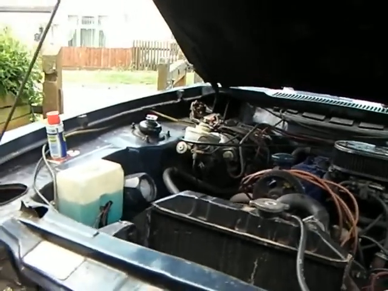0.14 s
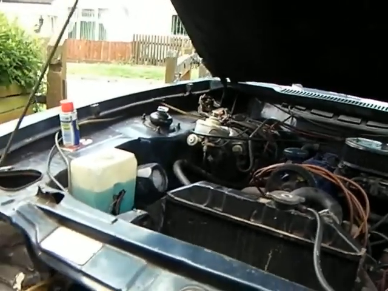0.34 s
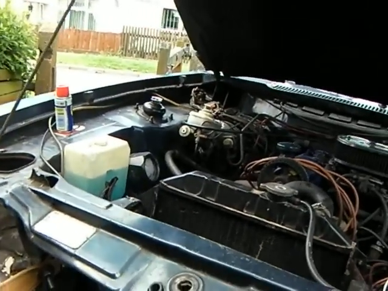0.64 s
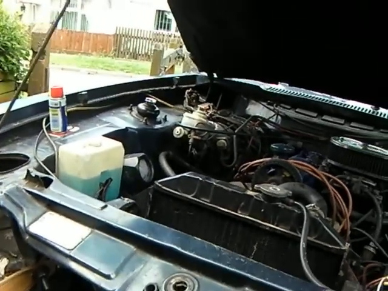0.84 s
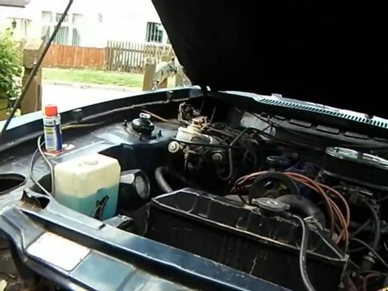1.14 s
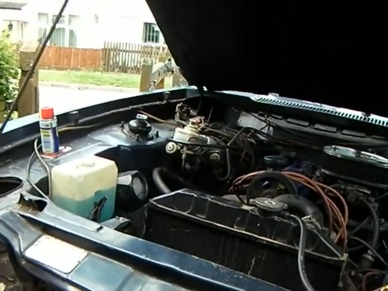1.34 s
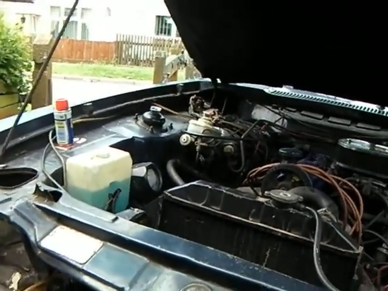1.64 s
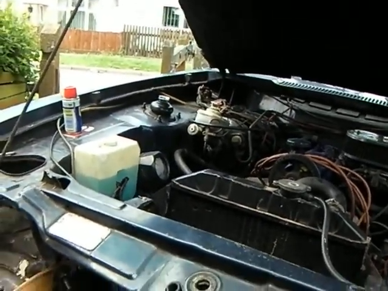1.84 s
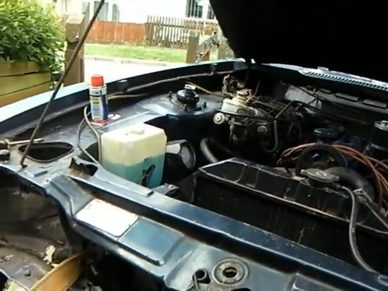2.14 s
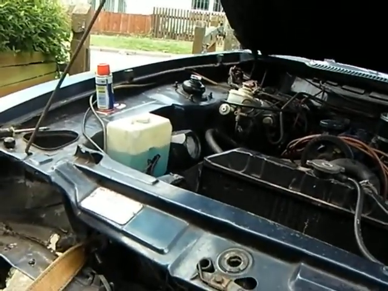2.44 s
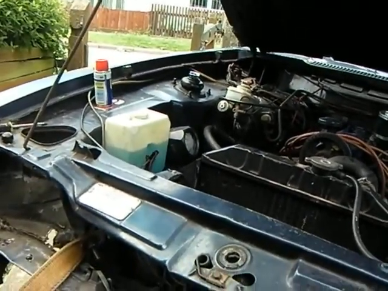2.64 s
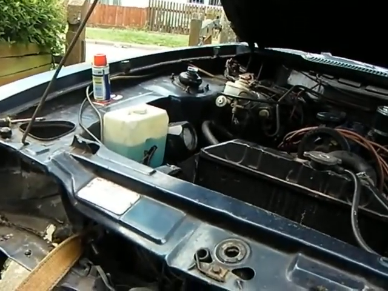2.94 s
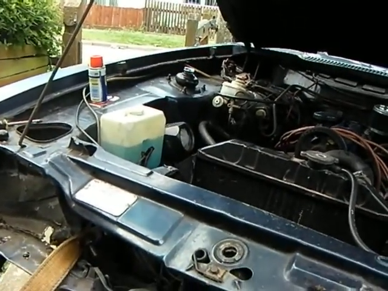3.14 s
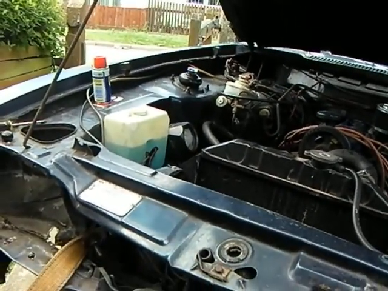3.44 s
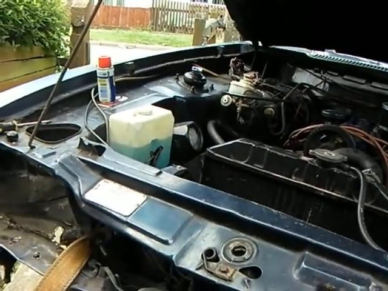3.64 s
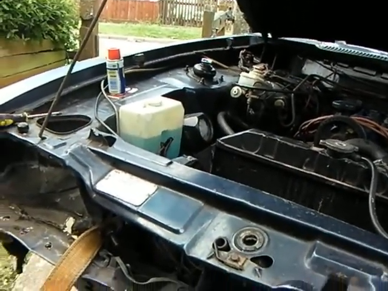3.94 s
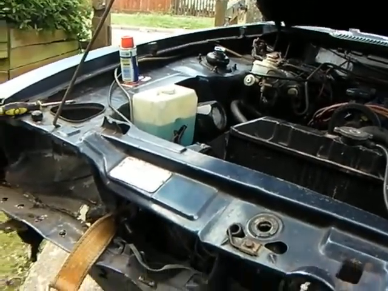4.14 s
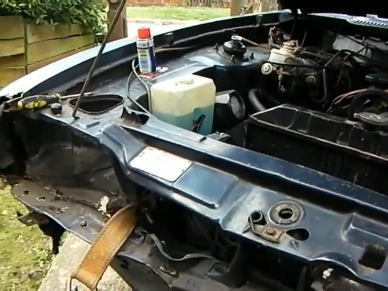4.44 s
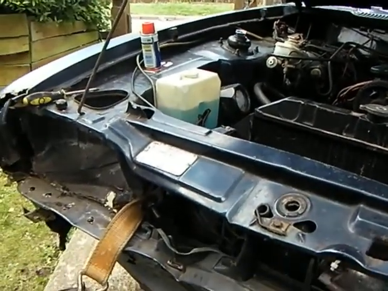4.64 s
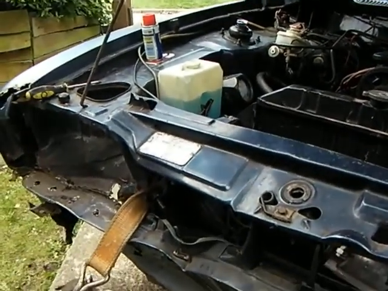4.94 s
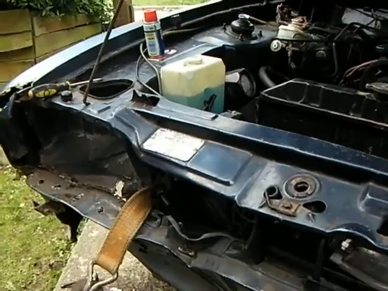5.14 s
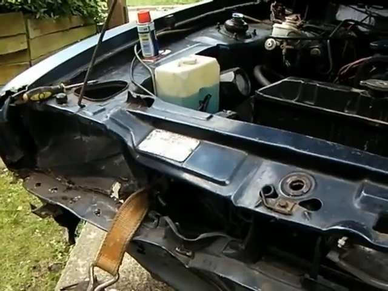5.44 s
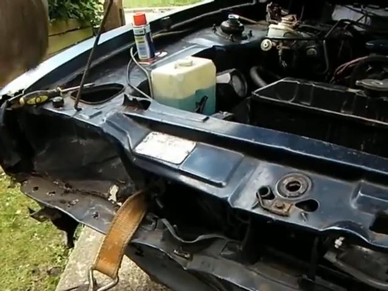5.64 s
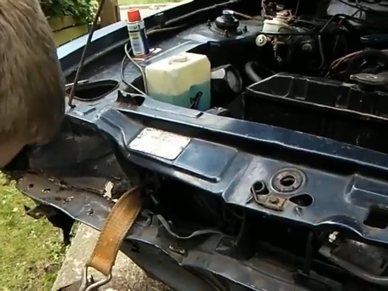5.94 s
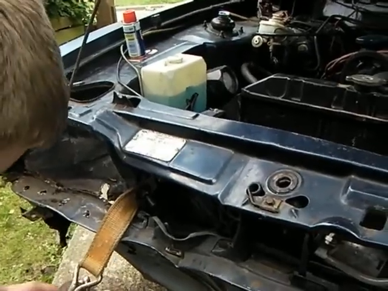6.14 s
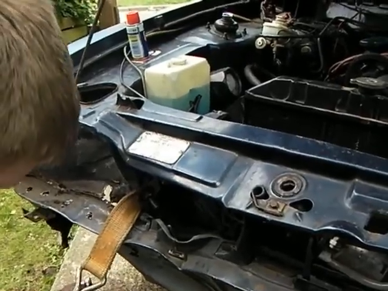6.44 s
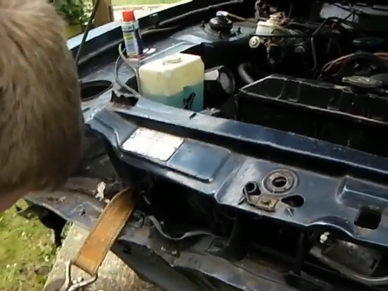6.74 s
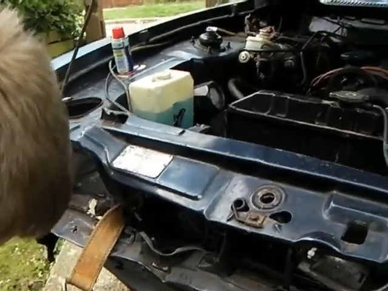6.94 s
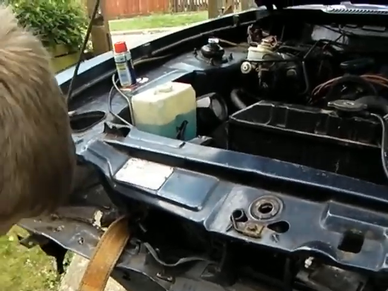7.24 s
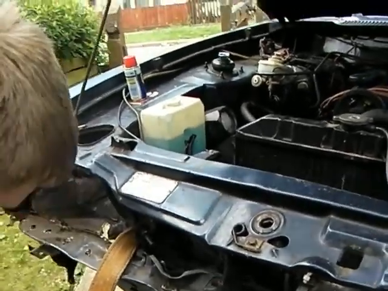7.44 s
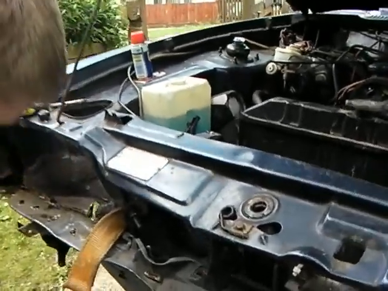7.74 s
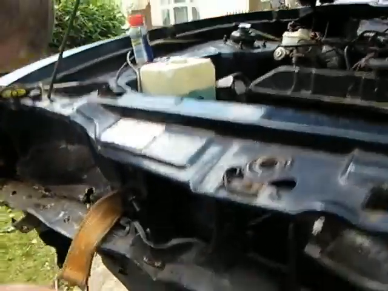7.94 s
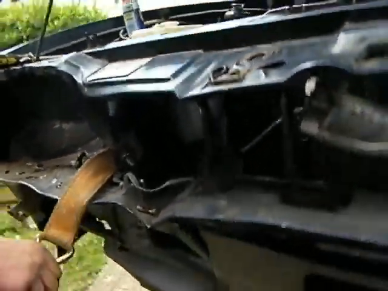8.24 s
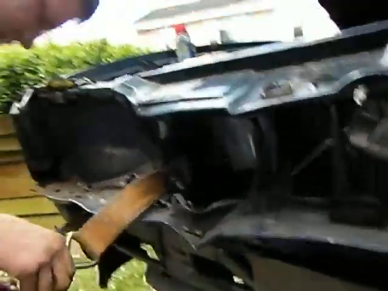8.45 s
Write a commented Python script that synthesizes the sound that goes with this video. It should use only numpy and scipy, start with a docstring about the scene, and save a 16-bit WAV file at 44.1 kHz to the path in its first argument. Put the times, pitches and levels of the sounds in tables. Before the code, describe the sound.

A ratchet strap is cranked tight on old car metal, with sharp steel cracks, creaks and low groans in bursts, amid crisp clicking rustle outdoors.

```python
"""Outdoors, at the front of an old car, close to a hand-held camera: a ratchet strap is hooked on and cranked tight.
Strap and steel fittings stick and slip: noise bursts and ringing steel modes for cracks, dense slips for creep.
The slips drive sheet-metal resonances; friction noise through a moving low resonance makes the groan.
Crisp clicks rustle by the microphone; a bright steel ping comes back from across the street.
Filtered noise gives handling rumble, bumps and steady outdoor air; short sines give faint far chirps."""
import sys
import numpy as np
from scipy import signal
from scipy.io import wavfile
from scipy.ndimage import uniform_filter1d, minimum_filter1d

SR = 44100
rng = np.random.default_rng(int(sys.argv[2]) if len(sys.argv) > 2 else 0)


def transcribe(u):
    """Save the signal u as a 16-bit wav file named by the first command-line argument.

    u: samples, shape (n,) or (channels, n), limited to [-1, 1]; the rate is SR.
    q: integer samples, one column per channel.
    """
    v = np.clip(np.atleast_2d(u).T, -1, 1)
    q = np.round(v * 32767).astype(np.int16)
    wavfile.write(sys.argv[1], SR, q)


N = 378637
TIME = np.arange(N) / SR
TAPS = 4096
BINS = np.fft.rfftfreq(TAPS, 1 / SR)  # Hz
EDGE_HZ = 16150  # upper band limit

# loud slips of the loaded strap, before gain: (time [s], level [dB], brightness [dB])
CRACKS = [(0.2917, -17, -2), (0.3414, -34.5, -17), (0.3937, -19.5, 2), (0.5467, -21.5, 5),
          (0.5657, -17.5, 2), (0.5774, -15.5, -5.5), (0.589, -21.5, 11), (0.655, -26, -10),
          (0.6709, -15, 0), (0.928, -21.5, -6), (1.0043, -16, 5.5), (1.0452, -15, -3), (1.0627, -14, -1.5),
          (1.0853, -27, 0), (1.1425, -12.5, 3.5), (1.1693, -22.5, 7.5), (1.2044, -20, -0.5),
          (1.9837, -25, -10.5), (1.996, -18, 11), (2.091, -27.5, 14.5), (2.12, -16.5, 7),
          (2.1388, -17.5, -8.5), (2.203, -20, -4), (2.228, -16, -2.5), (2.2425, -11, 6), (2.267, -23, 20.5),
          (2.282, -6.5, 1), (2.297, -15.5, 8), (2.3386, -13, 0), (2.4106, -20.5, -3), (2.454, -21.5, -3),
          (2.8479, -22.5, 2.5), (2.8927, -24, 3), (2.9785, -23.5, 8), (3.0568, -19, 8.5), (3.0984, -8.5, 5),
          (3.1451, -18.5, 5), (3.1755, -18, 5.5), (3.2041, -14.5, 1), (3.313, -30, 3), (3.3704, -17, 4.5),
          (3.394, -18, 5.5), (3.4288, -10.5, 4.5), (3.518, -18, 11), (3.536, -17, 10), (3.559, -20, 4),
          (3.5922, -15, 2.5), (3.651, -23, 7), (3.697, -22.5, -2.5), (3.835, -22.5, 1.5), (3.8735, -19, -1),
          (3.936, -22.5, 7), (3.985, -19, 1.5), (4.0343, -18.5, 5), (4.0649, -16, 1), (4.1328, -25, 6),
          (4.217, -28, 7), (4.3746, -25, 3.5), (4.4305, -23, 7), (4.4499, -19, 2.5), (4.478, -21, 0),
          (4.5048, -21, 8), (4.553, -26, 8), (4.6113, -25.5, 11.5), (4.6872, -21, 9.5), (4.7871, -19, -0.5),
          (4.804, -19, 0.5), (4.8843, -26.5, -1), (4.9445, -22.5, -2), (5.014, -23, 0), (5.055, -33, -8),
          (5.112, -21.5, 1), (5.15, -27, 2.5), (5.1622, -24.5, 11.5), (5.1982, -21, 2), (5.2368, -15.5, 3),
          (5.2705, -14, 7), (5.337, -17.5, 6), (5.3769, -17.5, 4), (5.83, -25, 0), (5.9576, -35.5, -5),
          (6.0061, -27, -0.5), (6.036, -35, -10), (6.049, -34, 2), (6.151, -33, -7.5), (6.678, -23, -2.5),
          (6.691, -26.5, -3), (6.707, -22.5, -2.5), (6.729, -19, -1.5), (6.7789, -15, 1.5), (6.811, -20, 5),
          (6.836, -17, 2.5), (6.858, -16.5, 5), (6.8798, -18.5, 7.5), (6.904, -22, 8), (6.919, -19, 3.5),
          (6.9734, -22.5, 2), (6.9941, -14.5, 2.5), (7.0162, -22.5, 6), (7.034, -20.5, 6.5),
          (7.099, -19.5, 2.5), (7.1514, -20.5, -1.5), (7.195, -25.5, 4.5), (7.211, -27.5, 6),
          (7.2717, -19.5, -2), (7.3189, -26.5, -4), (7.362, -36.5, -14.5), (7.701, -50.5, 4),
          (8.03, -48, -3), (8.2998, -26, -5)]
# resonances of ratchet and hook, before sharpness: (frequency [Hz], width [Hz], height [dB])
STEEL = [(2375, 990, 11.5), (3370, 360, 14.5), (3680, 505, 4.5), (4280, 880, 10.5), (4646, 210, 10),
         (5473, 720, 11.5), (6850, 690, 11.5), (7870, 190, 10), (8460, 190, 13.5), (11200, 600, 8.5),
         (11900, 223, -0.5), (14800, 740, 18)]
# how firmly the taut strap couples slips to the metal, before gain: (time [s], coupling [dB])
COUPLING = [(.3, 15), (1.25, 14.5), (2, 9), (3.1, 8.5), (4.5, 0.5), (5.3, 9.5), (5.8, -17), (6.8, -10),
            (7.2, 14.5), (8.3, -28)]
# pulls on the strap, levels before gain: (start [s], length [s], creep [dB], groan [dB],
# groan pitch [Hz], crackle [dB], camera shake [dB])
PULLS = [(0.27, 0.29, -27.5, -36, 374, -59, -43), (0.531, 0.17, -21.5, -42, 385, -36, -39.5),
         (0.768, 0.12, -33.5, -37.5, 390, -38, -47), (0.917, 0.24, -20.5, -38.5, 400, -26, -40.5),
         (1.959, 0.4, -19, -45.5, 407, -32, -46.5), (2.859, 0.26, -21, -45, 426, -32.5, -45),
         (3.271, 0.24, -21, -40.5, 481, -32.5, -50.5), (3.41, 0.36, -23.5, -56, 487, -31, -54.5),
         (3.804, 0.29, -22.5, -44, 466, -43, -56), (4.12, 0.17, -31, -54, 476, -54, -71),
         (4.312, 0.49, -25.5, -39, 466, -31, -73), (5.138, 0.27, -28, -44.5, 475, -43, -59),
         (6.786, 0.38, -24.5, -58, 460, -30, -68), (7.172, 0.21, -33.5, -66, 440, -33.5, -72)]


def amp(db):
    """Decibels to gain."""
    return 10 ** (np.asarray(db) / 20)


def unit(x):
    """Scales to rms 1."""
    return x / np.sqrt(np.mean(x ** 2) + 1e-20)


def read(points, hz):
    """Interpolates a spectrum on a log-frequency axis."""
    f, value = np.transpose(points)
    return np.interp(np.log(hz + 1), np.log(f + 1), value)


def curve(rows, order=1):
    """One column of a time table, at every sample."""
    columns = np.transpose(rows)
    return np.interp(TIME, columns[0], columns[order])


def add(mix, start_s, sound):
    """Mixes a sound in at start_s."""
    part = mix[..., max(round(start_s * SR), 0):][..., :sound.shape[-1]]
    part += sound[..., :part.shape[-1]]


def colour(x, db):
    """Causal minimum-phase filter with the gains db at BINS."""
    log_gain = np.log(amp(np.r_[db, db[-2:0:-1]]))
    response = np.fft.ifft(np.exp(signal.hilbert(log_gain).conj())).real
    return signal.oaconvolve(x, response[:TAPS // 2])[:len(x)]


def resonate(x, hz, width_hz):
    """Resonance of gain 1 whose frequency may move: shift to 0 Hz, one-pole lowpass, shift back."""
    turn = np.exp(2j * np.pi * np.cumsum(hz * np.ones(len(x))) / SR)
    r = np.exp(-np.pi * width_hz / SR)
    return 2 * (turn * signal.lfilter([1 - r], [1, -r], x / turn + 1e-18)).real


def steady(x, seconds):
    """Evens out the slow level and keeps the fine grain."""
    power = abs(uniform_filter1d(x ** 2, int(seconds * SR) + 1))
    return x / np.sqrt(power + 1e-12)


def ports(make, wide_db=0):
    """Left and right microphone ports: a common sound plus and minus an unrelated difference."""
    # difference against sum, before wide_db: (frequency [Hz], level [dB])
    width = [(60, -12.5), (140, -15.5), (300, -18), (1200, -20), (2500, -25.5), (4400, -8), (8000, -9.5),
             (15000, -4.5)]
    mid = make()
    side = colour(make(), read(width, BINS) + wide_db)
    return np.array([mid + side, mid - side])


def dying(energy, decay_s):
    """Each kick of energy dies away; decay_s is the amplitude time constant."""
    return signal.lfilter([1], [1, -np.exp(-2 / (decay_s * SR))], energy)


def kicks(per_s, spread_db):
    """Energy of randomly timed slips: many small, a few large."""
    happens = rng.random(N) < per_s / SR
    return happens * amp(spread_db * np.minimum(rng.exponential(1, N), 4)) ** 2


def strokes(rows, order, rise_s, fall_s, arch_db):
    """Gain for rows (start, length, levels..): each rises, arches over its middle and dies away."""
    power = np.zeros(N)
    for row in rows:
        start_s, length_s = row[:2]
        t = np.arange(int((length_s + 8 * fall_s) * SR)) / SR
        arch = amp(row[order] - arch_db * np.minimum((2 * t / length_s - 1) ** 2, 1))
        rise = np.minimum(t / rise_s, 1)
        fall = np.exp(-np.maximum(t - length_s, 0) / fall_s)
        add(power, start_s, (arch * rise * fall) ** 2)
    return np.sqrt(power)


def rustling():
    """Gain of the spells of rustling."""
    # crisp rustling between the pulls: (start [s], length [s], level [dB])
    spells = [(0.0, 0.29, -29.5), (1.215, 0.11, -36), (1.345, 0.19, -33), (1.54, 0.96, -34.5),
              (1.615, 0.049, -27), (2.38, 0.42, -37), (3.14, 0.32, -36.5), (3.73, 0.11, -40),
              (4.24, 0.081, -40), (4.8, 0.27, -38), (5.025, 0.083, -28), (5.46, 0.45, -38.5),
              (5.615, 0.15, -36.5), (5.85, 0.22, -51), (6.2, 0.17, -48), (6.72, 0.098, -28),
              (7.49, 0.083, -48), (8.33, 0.25, -57.5)]
    return strokes(spells, order=2, rise_s=0.012, fall_s=0.025, arch_db=2.0)


def steel_db(sharpness, vary_db):
    """Colour of one contact: where it slips decides each resonance's frequency and strength."""
    # slip under the resonances: (frequency [Hz], level [dB])
    slip_tone = [(100, -19), (300, -15.5), (600, -12), (1000, -5), (1600, -0.5), (2900, 0.5), (4000, 3),
                 (6200, 1.5), (9500, 3), (13000, -2.5), (15500, -16.5)]
    detune = 0.007  # relative
    chance = rng.standard_normal((len(STEEL), 2))
    peaks = 0
    for (hz, width_hz, db), (a, b) in zip(STEEL, chance):
        offset = 2 * (BINS - hz * (1 + detune * b)) / width_hz
        peaks = peaks + (db + vary_db * a) / (1 + offset ** 2)
    tone = read(slip_tone, BINS) + sharpness * peaks
    return tone - 10 * np.log10(np.mean(amp(tone) ** 2))


def cracks(burst_s=0.0061, ring_s=0.021, ring_db=-10, gain_db=4.0, release_db=2,
           detune=0.007, treble_damping=0.19, size=3000):
    """Sharp release and millisecond burst, then ringing steel modes unless slack webbing damps them."""
    out, t = np.zeros((2, N)), np.arange(size) / SR
    burst_shape, slack_slope = 1.8, 0.9  # exponent; dB of ring per dB of lost coupling
    burst = np.exp(-(t / burst_s) ** burst_shape)
    release = amp(release_db) * (t == 0)
    treble = read([(1500, -1.13), (4200, 0.34), (8000, 0.95), (15000, 1.4)], BINS)
    for s, db, bright_db in CRACKS:
        tone = steel_db(sharpness=1.126, vary_db=1.0) + bright_db * treble
        # bent plates have their modes in close pairs
        modes_hz = np.repeat(np.transpose(STEEL)[0], 2) * (1 + detune * rng.standard_normal(2 * len(STEEL)))
        heights = amp(np.interp(modes_hz, BINS, tone))
        damping = (modes_hz / STEEL[1][0]) ** treble_damping / ring_s  # 1/s
        waves = np.exp(np.outer(2j * np.pi * modes_hz - damping, t)) * (1 - np.exp(-t / 0.001))
        slack_db = min(np.interp(s, *np.transpose(COUPLING)), 0)
        freed = amp(ring_db + slack_slope * slack_db)

        def slip():
            noise = colour(burst * (release + rng.standard_normal(size)), tone)
            snap = unit(noise) * np.sqrt(np.mean(burst ** 2))
            phases = np.exp(2j * np.pi * rng.random(len(heights)))
            ring = ((heights * phases) @ waves).real
            return snap + freed * ring / np.sqrt(np.sum(heights ** 2) / 2)

        loudness = amp(db + gain_db) * np.sqrt(np.mean(amp(tone) ** 2))
        add(out, s, loudness * ports(slip, wide_db=-0.5))
    return out


def creep(gain_db=-0.5, stick_db=-9, stick_s=0.0024, jostle_db=-11, even_s=0.053, tail_db=-8, contacts=3):
    """Dense small slips at several contacts in each pull; the strap sticks briefly before each crack."""
    slips = [kicks(per_s=75, spread_db=6.0) for _ in range(contacts)]
    energy = np.array([dying(k, decay_s=0.007) + amp(tail_db) ** 2 * dying(k, decay_s=0.026) + 0.003
                       for k in slips])
    share = energy / abs(uniform_filter1d(energy.sum(0), int(even_s * SR)))
    stuck = np.zeros(N)
    for s, _, _ in CRACKS:
        add(stuck, s - 1.5 * stick_s, np.hanning(int(2 * stick_s * SR)))
    out = 0
    for part in share:
        tone = steel_db(sharpness=0.72, vary_db=-1.0)
        out = out + ports(lambda: colour(np.sqrt(part) * rng.standard_normal(N), tone), wide_db=1.0)
    effort = strokes(PULLS, order=2, rise_s=0.03, fall_s=0.027, arch_db=4.5)
    activity = np.hypot(effort, amp(jostle_db) * rustling())
    return out * activity * amp(gain_db + stick_db * stuck)


def panel(slips, gain_db=4):
    """The strap carries the slips into the sheet metal, which rings on."""
    # pulled sheet metal: (frequency [Hz], width [Hz], level [dB])
    modes = [(982, 39, -8.5), (1410, 15, 0), (1573, 330, -11), (2174, 51, -4), (3330, 60, -13),
             (4400, 94, -3), (4670, 80, -14)]
    drive = slips.mean(0) * amp(curve(COUPLING) + gain_db)
    # broad sheet radiates the low modes best
    lift_db = read([(1500, -3.0), (2300, -6.0), (3300, -16.5)], BINS)
    drive = colour(drive, lift_db)
    return sum(amp(db) * resonate(drive, hz, width_hz) for hz, width_hz, db in modes)


def groan(gain_db=-2.0, width_hz=55, waver_db=0.5):
    """Friction noise excites one low body resonance in each pull; level wavers, pitch follows PULLS."""
    hz = curve([(row[0] + row[1] / 2, row[4]) for row in PULLS])

    def voice():
        narrow = resonate(rng.standard_normal(N), hz, width_hz)
        return steady(resonate(narrow, hz, 2 * width_hz), seconds=0.15)

    slow = uniform_filter1d(rng.standard_normal(N), int(0.045 * SR))
    waver = unit(uniform_filter1d(slow, int(0.02 * SR)))
    effort = strokes(PULLS, order=3, rise_s=0.03, fall_s=0.07, arch_db=5.0)
    return ports(voice, wide_db=-3.5) * effort * amp(gain_db + waver_db * waver)


def rustle(gain_db=-2.0, snap_db=5.0, tail_db=-17):
    """Very short dry clicks, each trailed by a little fizz, during the pulls and between them."""
    # rustle colour: (frequency [Hz], level [dB])
    rustle_tone = [(290, -20.5), (500, -10), (817, -29.5), (1160, -8.5), (1780, -19), (1940, -8.5),
                   (3040, -10.5), (5050, -2.5), (10900, 3.5), (15800, -4)]
    # sharpest snaps, before snap_db: (time [s], level [dB])
    sharp_snaps = [(0.112, -22), (0.1634, -22), (0.176, -13), (0.202, -14.5), (0.214, -19), (0.2562, -15),
                   (0.475, -14), (0.5176, -21.5), (0.708, -17.5), (1.4005, -16), (1.4323, -8),
                   (1.6252, -20), (1.6829, -18), (1.7753, -16), (2.5146, -21), (2.8155, -16), (5.039, -17),
                   (5.6339, -21), (6.21, -31.5), (7.2678, -15.5), (7.3772, -35), (7.514, -30)]

    def grain(energy):
        return dying(energy, decay_s=0.00043) + amp(tail_db) ** 2 * dying(energy, decay_s=0.018)

    snaps = np.zeros(N)
    for s, db in sharp_snaps:
        add(snaps, s, amp([db + snap_db]) ** 2)
    small = steady(np.sqrt(grain(kicks(per_s=430, spread_db=8.0)) + 0.061), seconds=0.087)
    crackle = strokes(PULLS, order=5, rise_s=0.02, fall_s=0.015, arch_db=3.0)
    activity = np.hypot(rustling(), crackle)
    shape = np.sqrt((small * activity * amp(gain_db)) ** 2 + grain(snaps))
    tone = read(rustle_tone, BINS) - np.maximum(BINS - EDGE_HZ, 0) / 100
    tone = tone - 10 * np.log10(np.mean(amp(tone) ** 2))
    return ports(lambda: colour(shape * rng.standard_normal(N), tone), wide_db=4.0)


def ping(ring_db=-28, free_s=2.672):
    """Steel snaps against steel, then swings free and rings in high decaying modes."""
    # modes of a small steel part, before ring_db: (frequency [Hz], level [dB], t60 [s])
    modes = [(3690, -16.5, .15), (5230, 1, 0.18), (5550, -10, .22), (7903, 4, .17), (8040, -13.5, 0.17),
             (9870, -5.5, .17), (10700, 6, .13), (10750, 1, 0.121), (12350, -2, 0.45), (12250, -4, .5),
             (15330, 6, .13)]
    # hard contacts, the last an echo from the houses: (time [s], level [dB], decay [s])
    hits = [(2.656, -3, 0.0039), (2.656, -7.5, 0.019), (2.747, -26, 0.0097)]
    # contact colour: (frequency [Hz], level [dB])
    contact_tone = [(1000, -63), (4000, -29.5), (9000, -18), (11600, -13.5), (12350, 9), (13200, -20.5),
                    (16000, -26)]
    out, t = np.zeros((2, N)), np.arange(SR // 3) / SR

    def contact():
        return steady(colour(rng.standard_normal(len(t)), read(contact_tone, BINS)), seconds=0.0034)

    def ring():
        return sum(amp(db - 60 * t / t60_s) * np.sin(2 * np.pi * (hz * t + rng.random()))
                   for hz, db, t60_s in modes)

    for s, db, decay_s in hits:
        envelope = np.exp(-t / decay_s) * (1 - np.exp(-t / 0.000086))
        add(out, s, amp(db) * ports(contact, wide_db=-1.5) * envelope)
    add(out, free_s, amp(ring_db) * ports(ring, wide_db=-1.0) * (1 - np.exp(-t / 0.001)))
    return out


def handling(gain_db=0.5):
    """Low noise rumble swelling with each pull; narrow noise bursts for soft bumps, scuffs and squeaks."""
    # rumble colour: (frequency [Hz], level [dB])
    rumble_tone = [(20, -15), (50, -3.5), (95, 2), (135, 0.5), (200, -7.5), (300, -9.5), (600, -6.5),
                   (1200, -10), (3000, -97.5)]
    # rumble from holding the camera, before gain: (time [s], level [dB])
    hold = [(0, -48.5), (1.5, -53), (2.3, -49.5), (2.68, -62), (2.84, -53), (3.9, -55.5), (4.25, -69.5),
            (5.9, -72.5), (7.95, -65), (8.2, -58), (8.59, -54.5)]
    # bumps, scuffs, squeaks: (time [s], level [dB], length [s], frequency [Hz], width per stage [Hz])
    bumps = [(0.015, -32.5, 0.096, 1760, 2050), (0.317, -34.5, 0.045, 1410, 60),
             (0.404, -28.5, 0.044, 1410, 90), (0.678, -35.5, 0.05, 403, 70), (0.95, -43, 0.055, 136, 90),
             (0.96, -45, 0.11, 1410, 50), (1.169, -41.5, 0.042, 109, 90), (1.196, -38.5, 0.058, 1410, 50),
             (1.911, -46, 0.058, 390, 60), (2.808, -41.5, 0.025, 249, 400),
             (2.837, -40.5, 0.037, 474, 79.5), (6.036, -54, 0.06, 453, 300), (6.749, -46.5, 0.043, 89, 122),
             (6.89, -53, 0.12, 100, 89.5), (7.267, -44.5, 0.05, 570, 600), (8.068, -46, 0.05, 90, 61),
             (8.119, -40, 0.041, 94.5, 50), (8.317, -57.5, 0.27, 420, 143)]

    def rumble():
        return steady(colour(rng.standard_normal(N), read(rumble_tone, BINS)), seconds=0.2)

    shake = strokes(PULLS, order=6, rise_s=0.037, fall_s=0.04, arch_db=1.0)
    out = ports(rumble, wide_db=5.5) * np.hypot(amp(curve(hold)), shake) * amp(gain_db)
    for s, db, length_s, hz, width_hz in bumps:
        window = signal.windows.tukey(int(length_s * SR), 0.7)

        def bump():
            noise = resonate(rng.standard_normal(len(window)), hz, width_hz)
            return unit(resonate(noise, hz, width_hz) * window)

        add(out, s, amp(db) * ports(bump, wide_db=2))
    return out


def outdoors(level_db=-55.5):
    """Steady coloured noise with a few faint far chirps: short windowed sines."""
    # background colour: (frequency [Hz], level [dB])
    air_tone = [(20, -21.5), (60, -8.5), (130, -3.5), (260, -16.5), (420, 0.5), (620, -10.5), (1000, -11.5),
                (2000, -11), (5000, -17), (10000, -20), (15800, -24)]
    # chirps: (time [s], level [dB], length [s], frequency [Hz])
    chirps = [(4.892, -39, 0.027, 2630), (5.954, -48, 0.055, 2300), (6.248, -50, 0.021, 2530),
              (6.59, -52.5, 0.065, 2520), (8.194, -51, 0.026, 1280), (8.44, -49.5, .025, 4070)]

    def air():
        return unit(colour(rng.standard_normal(N), read(air_tone, BINS)))

    out = amp(level_db) * ports(air, wide_db=6.5)
    for s, db, length_s, hz in chirps:
        t = np.arange(int(length_s * SR)) / SR
        add(out, s, amp(db) * np.hanning(len(t)) * np.sin(2 * np.pi * hz * t))
    return out


def scene():
    """Sum of all sources at the camera."""
    slips = cracks() + creep()
    return slips + panel(slips) + groan() + rustle() + ping() + handling() + outdoors()


def record(dry, limiter_samples=45):
    """Slightly unequal ports, a fast limiter on the hardest peaks, band limit."""
    balance_db = read([(1000, -0.1), (2800, -0.46), (5500, 0.39), (14000, 0.5)], BINS)
    heard = np.array([colour(dry[0], balance_db), colour(dry[1], -balance_db)])
    limit = 1 / np.maximum(abs(heard).max(0), 1)
    heard = heard * uniform_filter1d(minimum_filter1d(limit, limiter_samples), limiter_samples)
    lowpass = signal.firwin(401, EDGE_HZ, window=("kaiser", 7), fs=SR)
    return signal.oaconvolve(heard, lowpass[None], "same")


dry = scene()
out = record(dry)
transcribe(out)
```